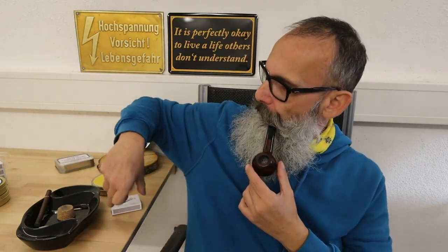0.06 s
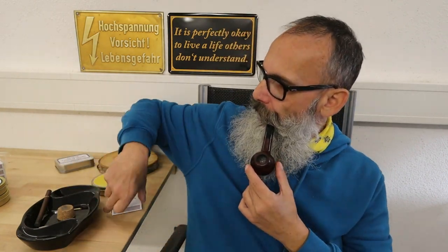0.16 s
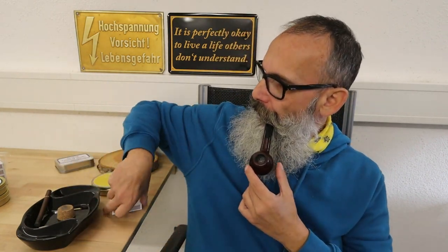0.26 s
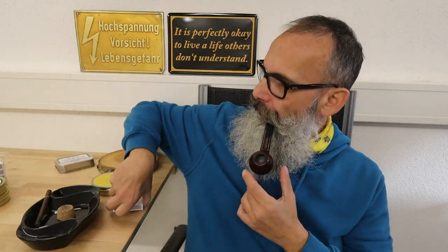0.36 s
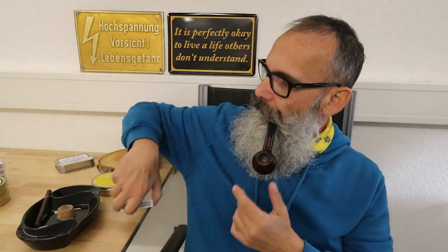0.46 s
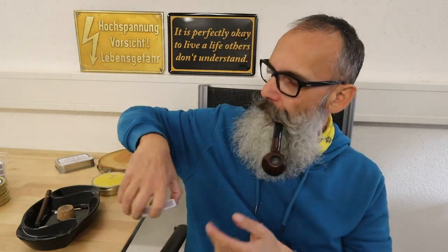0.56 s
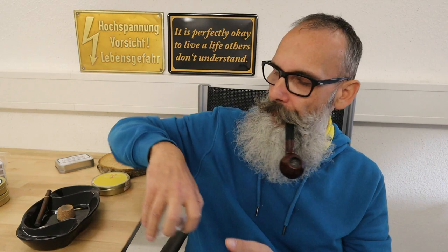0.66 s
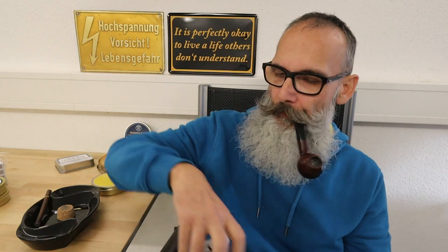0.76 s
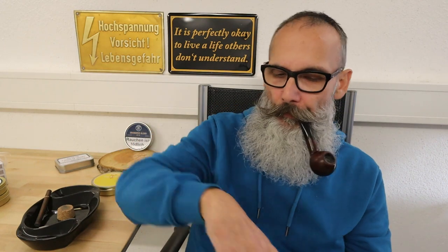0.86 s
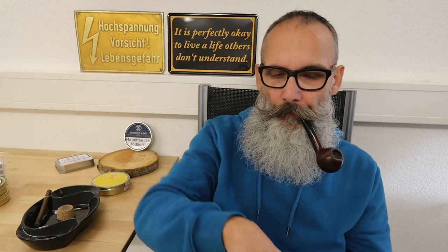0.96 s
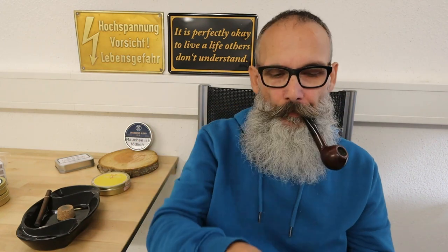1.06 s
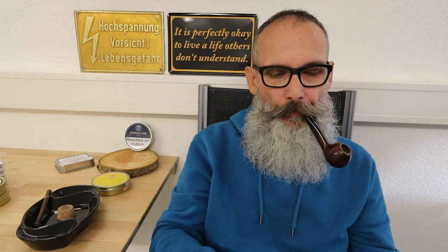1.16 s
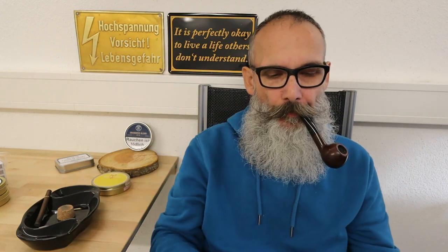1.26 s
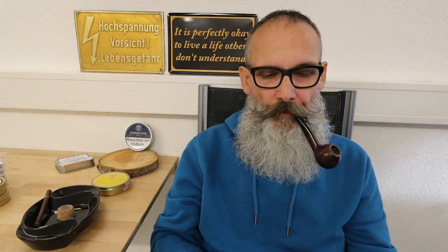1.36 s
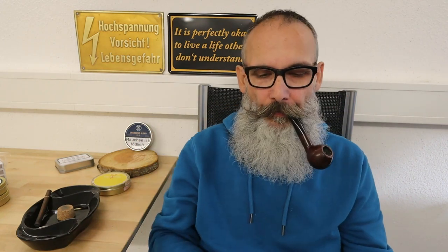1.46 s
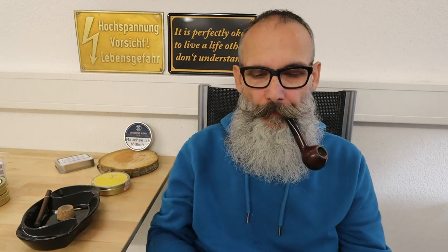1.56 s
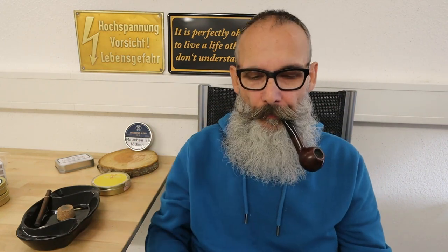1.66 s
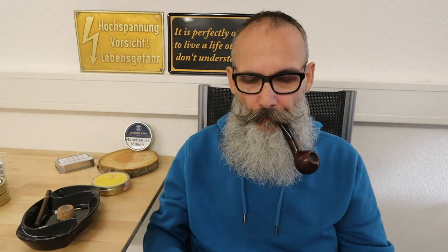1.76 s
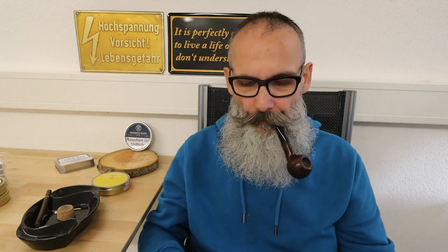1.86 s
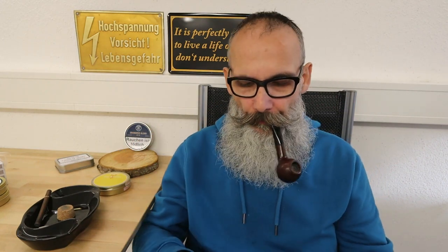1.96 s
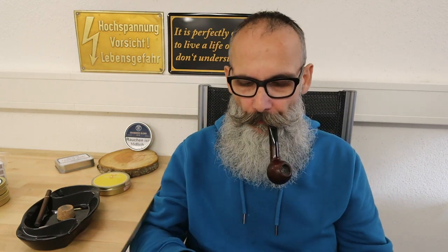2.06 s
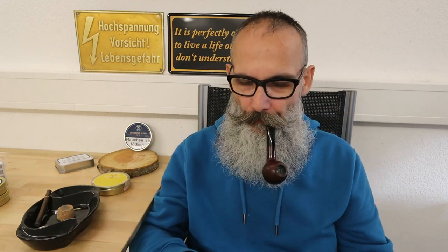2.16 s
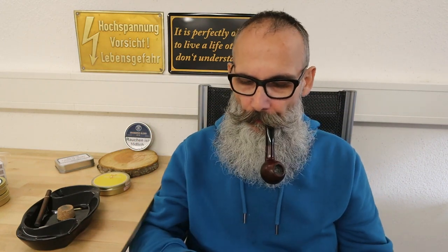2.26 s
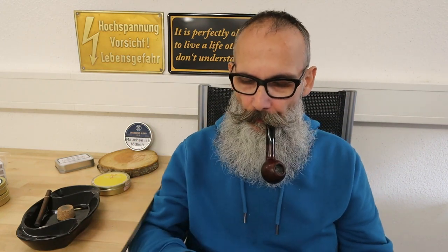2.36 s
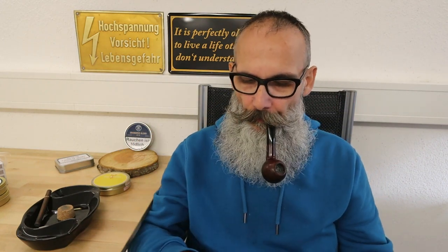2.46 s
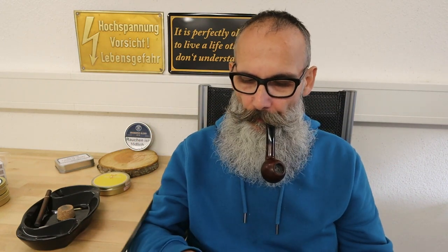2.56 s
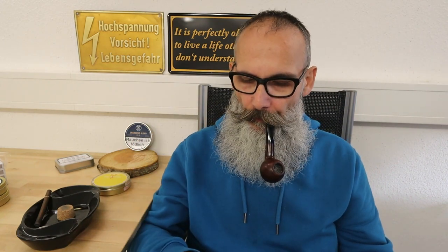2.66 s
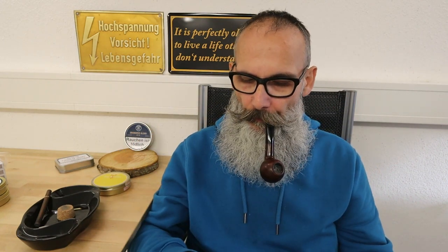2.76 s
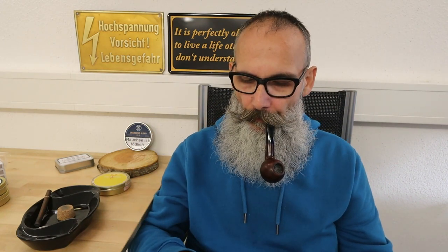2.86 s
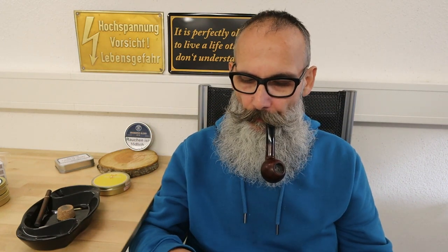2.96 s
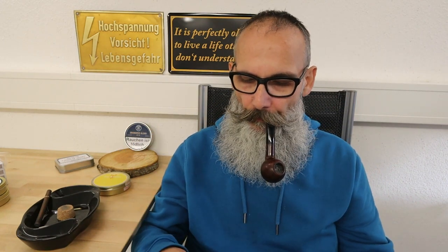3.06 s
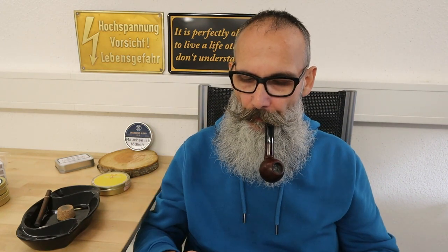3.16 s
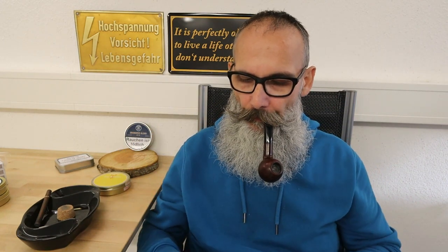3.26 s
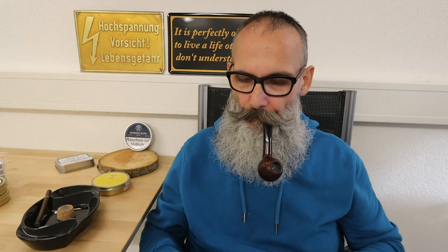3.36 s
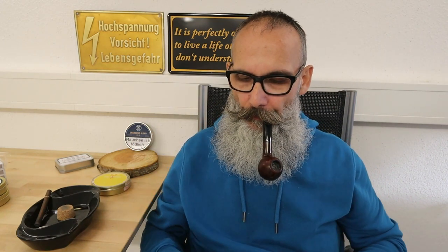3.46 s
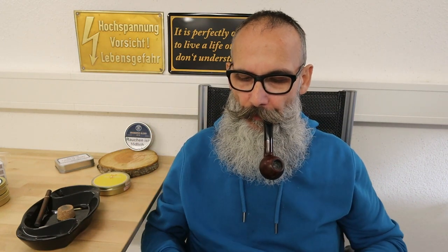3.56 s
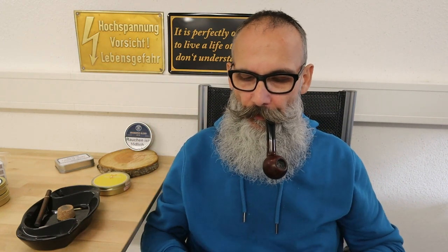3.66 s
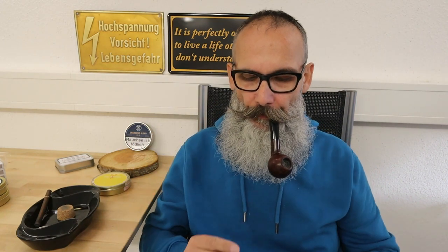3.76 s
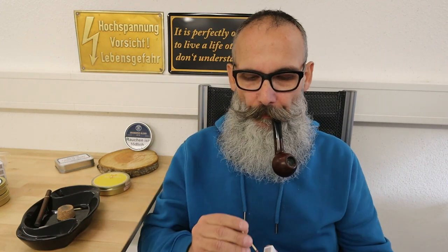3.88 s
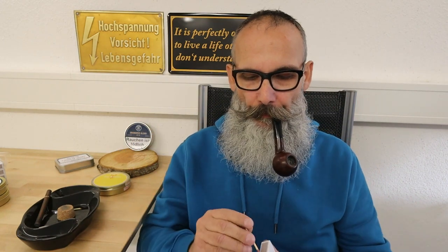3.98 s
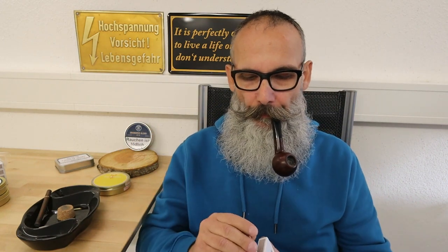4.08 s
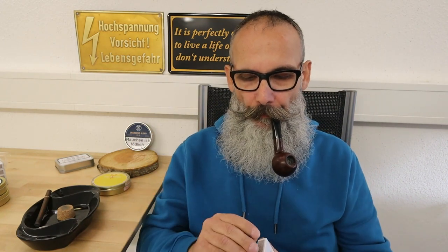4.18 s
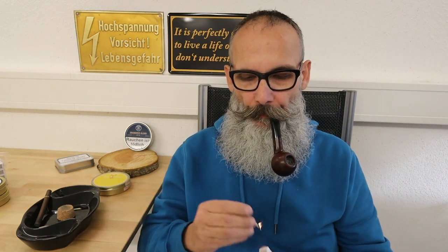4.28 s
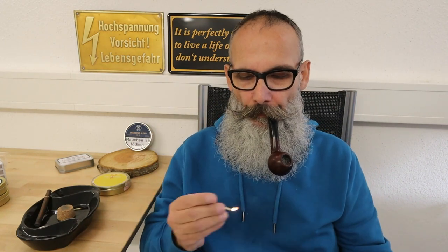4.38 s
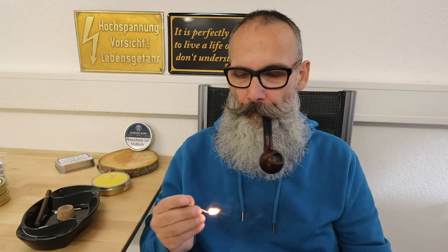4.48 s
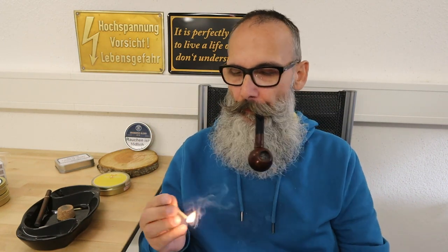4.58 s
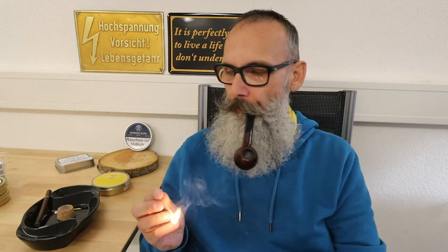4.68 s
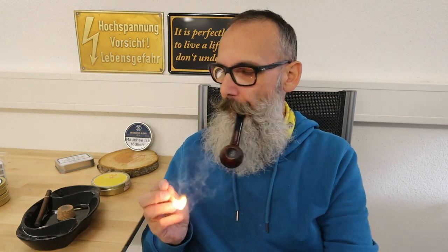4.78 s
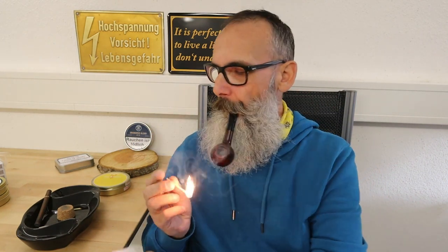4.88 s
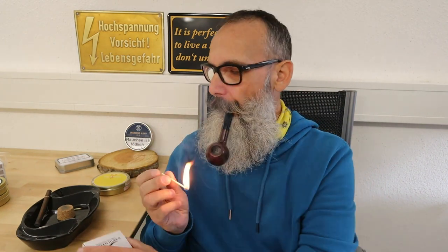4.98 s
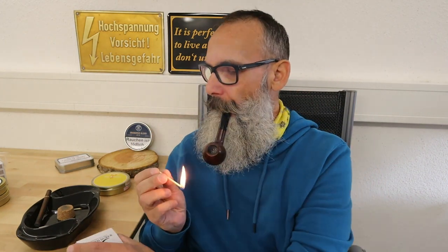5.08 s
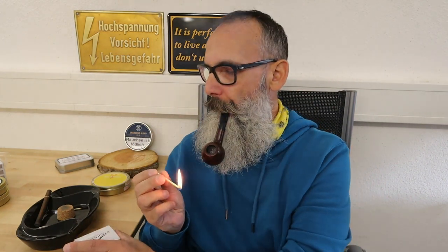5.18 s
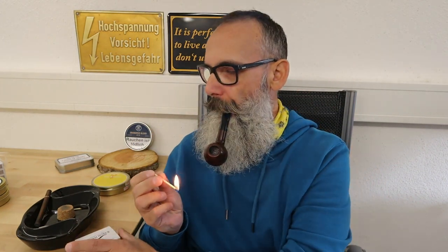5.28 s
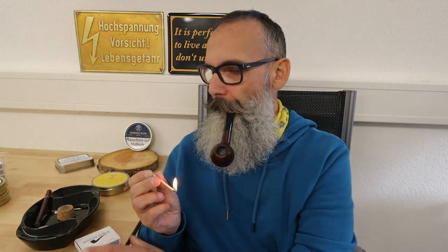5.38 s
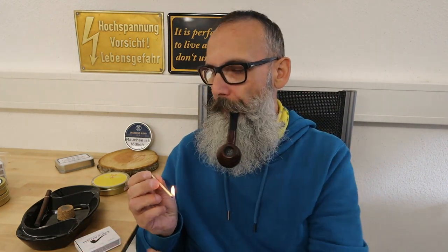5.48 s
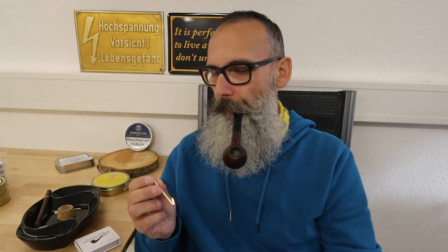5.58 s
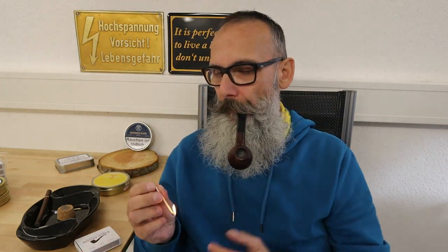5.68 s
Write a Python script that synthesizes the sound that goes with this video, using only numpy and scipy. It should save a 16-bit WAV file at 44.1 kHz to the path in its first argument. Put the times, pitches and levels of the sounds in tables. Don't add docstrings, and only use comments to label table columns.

```python
import sys
import numpy as np
from scipy import signal
from scipy.fft import rfft, irfft, next_fast_len
from scipy.io import wavfile

SR = 44100
rng = np.random.default_rng(int(sys.argv[2]) if len(sys.argv) > 2 else 0)


def voltage_ratio(level):
    return 10 ** (np.asarray(level, float) / 20)


def file_out(sig):
    cols = np.atleast_2d(sig).T
    lim = np.clip(cols, -1, 1)
    pcm = np.round(lim * 32767).astype(np.int16)
    wavfile.write(sys.argv[1], SR, pcm)


N = 252693

# centre in Hz, width in Hz, level in dB.
BOX_MODES = [(456, 440, 0), (3040, 970, 0), (4040, 580, 2.5), (4770, 810, 1), (6330, 2730, -5),
             (8670, 1800, -7), (14400, 1300, -19.5)]


def unit(x):
    return x / np.sqrt(np.mean(x ** 2) + 1e-20)


def along(points, hz):
    f, v = np.transpose(points)
    return np.interp(np.log(hz + 1), np.log(f + 1), v)


def curves(rows):
    s, level, *cols = np.transpose(rows)
    t = np.arange(N) / SR
    return [np.interp(t, s, level, -150, -150)] + [np.interp(t, s, c) for c in cols]


def wobble(rate):
    knots = rng.standard_normal(int(N * rate // SR + 2))
    return np.interp(np.arange(N) * rate / SR, np.arange(len(knots)), knots)


def swells(starts, lengths, gains, attack_s, fade_db_per_s):
    t = np.arange(N) / SR
    total = np.zeros(N)
    for s, hold, gain in zip(starts, lengths, gains):
        rise = np.clip(1 + (t - s) / attack_s, 0, 1) ** 2
        total += gain * rise * voltage_ratio(-fade_db_per_s * np.maximum(t - s - hold, 0))
    return total


def filtered(x, response, size=8192):
    m = next_fast_len(len(x) + size)
    return irfft(rfft(x, m) * response(np.fft.rfftfreq(m, 1 / SR)), m)[:len(x)]


def mode(f, hz, width):
    return 1j * f * width / (hz * hz - f * f + 1j * f * width)


def cavity(f, hz, width=300):
    return mode(f, hz, width) * mode(f, hz, 4 * width)


def walls(f):
    modes = 0
    for k, (hz, width, db) in enumerate(BOX_MODES[1:]):
        modes = modes + (-1) ** k * voltage_ratio(db) * mode(f, hz, width)
    return modes * 1j * f / (2200 + 1j * f)


def grit(count, spiky_db):
    size_db = spiky_db * np.minimum(rng.exponential(size=count), 4.5)
    return unit(rng.standard_normal(count) * voltage_ratio(size_db))


def opening(s):
    # time in seconds, cavity pitch in Hz.
    cavity_pitch = [(.2, 1800), (.38, 1370), (.56, 1380), (.75, 1930), (1.2, 1836), (1.4, 1720),
                    (1.5, 1770), (1.535, 2270), (1.57, 1740), (1.7, 1900), (2.14, 1960), (2.23, 1990),
                    (2.27, 1684), (2.6, 1685), (2.95, 1740), (3.2, 2000), (3.5, 2310), (3.58, 1390),
                    (3.8, 1300), (3.89, 1350), (4.1, 1280), (4.32, 1250), (4.37, 1640), (4.8, 1260),
                    (5.22, 1430), (5.245, 1900), (5.3, 1900), (5.36, 1260)]
    return np.interp(s, *np.transpose(cavity_pitch))


def air():
    # frequency in Hz, level in dB per Hz.
    vent_spectrum = [(12, -46), (20, -7), (107, -16), (154, -14.5), (193, -20.5), (277, -19), (301, -26),
                     (328, -20), (499, -22), (642, -24), (1030, -22.5), (7110, -34.5), (12800, -39),
                     (16000, -42)]
    # start in seconds, length in seconds, level in dB.
    traffic = [(.15, 0.25, -60), (0.796, 0.18, -52.5), (2.028, 0.058, -47), (2.686, 0.094, -57),
               (3.6, 0.44, -59.5), (5.04, 0.22, -52.5)]
    rush = filtered(rng.standard_normal(N), lambda f: voltage_ratio(along(vent_spectrum, f)) * f ** 2 / (f ** 2 + 60 ** 2))
    drone = unit(filtered(rng.standard_normal(N), lambda f: cavity(f, 66, 35)))
    s, hold, db = np.transpose(traffic)
    passing = swells(s, hold, voltage_ratio(db - 5), attack_s=0.52, fade_db_per_s=11.5)
    return voltage_ratio(-53 + 0.4 * wobble(2.5)) * unit(rush) + passing * drone


def table():
    # time in seconds, pitch in Hz, level in dB, 60 dB decay time in seconds.
    hums = [
        (0, 158, -32.5, 0.21),
        (0.062, 158.5, -44, 2.2),
        (5.234, 144.3, -42, 0.96),
        (5.38, 143.7, -46.5, 1.3),
    ]
    hum = np.zeros(N)
    for s, hz, db, t60 in hums:
        t = np.maximum(np.arange(N) / SR - s, 0)
        tone = np.sin(2 * np.pi * hz * t + 0.67 * wobble(28))
        hum += voltage_ratio(db - 4.5 - 60 * t / t60) * tone * np.clip(t / 0.0015, 0, 1)
    return hum * voltage_ratio(1.5 * wobble(11.0))


def squeak():
    # time in seconds, pitch in Hz, level in dB.
    drag = [(.248, 1940, -70), (0.259, 1913, -43), (.31, 1915, -53), (0.332, 1880, -81), (.35, 1847, -49),
            (0.384, 1930, -45), (.4, 1810, -77)]
    s, hz, db = np.transpose(drag)
    level_db, pitch = curves(np.transpose([s, db, hz]))
    turn = 2 * np.pi * np.cumsum(pitch + 60 * wobble(150)) / SR
    partials = np.sin(turn) + 0.75 * np.sin(1.88 * turn + 0.81 * wobble(370))
    return voltage_ratio(level_db - 1.0 + 2.6 * wobble(113.0)) * partials


def rubbing():
    # time in seconds, level in dB.
    tray_slide = [(1.452, -52), (1.458, -43.5), (1.49, -42), (1.52, -37.5), (1.54, -40), (1.548, -57)]
    # start in seconds, length in seconds, level in dB, brightness in dB.
    strokes = [(0.272, 0.19, -51, -6.5), (0.594, .26, -51.5, -6.5), (0.954, 0.33, -53.5, -5),
               (1.201, 0.051, -42.5, -11.5), (1.39, 0.25, -45.5, -3.5), (1.57, 0.38, -51, -18),
               (2.15, 0.084, -37.5, -2), (2.273, 0.095, -42.5, -1.5), (2.353, 0.014, -32.5, -18),
               (2.55, 0.19, -37, -6), (2.79, 0.24, -43, -5.5), (3.218, 0.046, -56.5, 1.5),
               (3.283, 0.11, -47, -1), (3.423, 0.11, -43, -5.5), (3.65, 0.13, -75, -5),
               (3.819, 0.053, -36.5, -8), (4.083, 0.28, -82, -31)]
    # start in seconds, length in seconds, level in dB.
    arm_moves = [(0.453, 0.26, -53.5), (1.59, 0.56, -49), (2.15, 0.76, -48), (3.787, 0.066, -49.5),
                 (4.527, 0.45, -49)]

    slips = unit(grit(count=N, spiky_db=2.2) * voltage_ratio(2.5 * wobble(90) + 2.2 * wobble(330)))
    s, hold, db, bright_db = np.transpose(strokes)
    attack_s, fade_db_per_s = 0.053, 101
    press = swells(s, hold, voltage_ratio(db - 4.0), attack_s, fade_db_per_s)
    bright = swells(s, hold, voltage_ratio(db + bright_db - 4.0), attack_s, fade_db_per_s)
    rub = slips * press
    slide = slips * voltage_ratio(curves(tray_slide)[0])

    hz = opening(np.arange(N) / SR)
    shut = np.clip((1700 - hz) / 400, 0, 1)
    wide = np.clip((hz - 1800) / 300, 0, 1)
    ajar = rub * np.sqrt(np.abs(1 - shut - wide)) + slide
    hollow = filtered(rub * np.sqrt(shut), lambda f: voltage_ratio(3.0) * cavity(f, 1300, 339) - voltage_ratio(-5) * cavity(f, 480, 377))
    hollow += filtered(rub * np.sqrt(wide), lambda f: cavity(f, 2330, 510) - voltage_ratio(-1) * cavity(f, 1190, 315))
    hollow += filtered(ajar, lambda f: voltage_ratio(2) * cavity(f, 1770, 300) - voltage_ratio(-7) * cavity(f, 980, 460))
    card = filtered(slips * bright + voltage_ratio(2.0) * slide, walls)

    s, hold, db = np.transpose(arm_moves)
    cloth = unit(filtered(slips, lambda f: cavity(f, 310, 364)))
    sleeve = swells(s, hold, voltage_ratio(db - 7.5), attack_s=0.3, fade_db_per_s=44) * cloth
    return voltage_ratio(17.5) * hollow - voltage_ratio(15.0) * card + sleeve


def pushes():
    # time in seconds, peak in dB.
    pops = [
        (1.4, -25.5),
        (3.6845, -17.5),
    ]
    low_hz, high_hz, edge_db = 216, 1900, -36
    blows = np.zeros(N)
    for s, db in pops:
        blows[round(s * SR)] = voltage_ratio(db + 23.5)

    def pulse(f):
        low_cut = (1j * f / (low_hz + 1j * f)) ** 2
        return low_cut * (1 / (1 + 1j * f / high_hz) ** 2 + voltage_ratio(edge_db))
    return filtered(blows, pulse)


def contacts():
    # time in seconds, peak in dB, brightness in dB, length in ms. Fingers rub the box
    lift = [(.2675, -32.5, 2, 1.6), (.2824, -33, -2, 0.79), (.368, -27, -5, 1.7), (.4952, -28.5, 4, 4.2),
            (.5529, -29, -2, 0.64), (.6673, -32.5, 6, 1.1), (.7295, -32, 2, 0.37), (.783, -23, 5.5, 3.7),
            (.8408, -31, 6, 1), (.95, -33, -4, 3.8), (1.0172, -32, -10, 0.82), (1.0397, -30.5, -9, 2.4)]
    tray_out = [(1.2214, -22, -1, 2), (1.2486, -16, -1, 1.3), (1.2613, -18, -1.5, 3),
                (1.2742, -15, -2, 0.61), (1.4057, -22, -17, 0.87), (1.4191, -19.5, -20, 1.2),
                (1.4372, -20, -11, 2.3), (1.4732, -14.5, -4, 3.7), (1.5061, -16, -16, 1.5),
                (1.5244, -17, -13, 0.58), (1.6688, -12.5, 4.5, 0.39), (1.672, -19, 8, 2.8),
                (1.7025, -17, -3, 2.8), (1.46, -17, -11, 3.3), (1.536, -9.5, -11, 1.2)]
    shake = [(2.1365, -12, 2, 1.1), (2.141, -8.5, 12, 2.5), (2.149, -10, 2, 1.8), (2.1534, -0.5, 2, 0.6),
             (2.158, -13, 3, 1.9), (2.1709, -17, 23, 1.9), (2.181, -24, 3, 3), (2.216, -15.5, 9, 3),
             (2.223, -15, 8, 3), (2.232, -11, 6, 0.87), (2.239, -25, 7, 3), (2.248, -17, 2, 3),
             (2.2553, -10.5, 1.5, 3), (2.264, -25, 2, 3), (2.3191, -4.5, 3, 1.5), (2.3341, -11.5, -9, 1.6),
             (2.352, -10.5, 8, 2.5), (2.3575, -3.5, 3, 2), (2.363, -11, 9, 0.61), (2.3705, -9, 19, 1.3),
             (2.378, -11, 6, 2.5), (2.39, -22, -13, 6.4), (2.556, -18, 8, 1.6), (2.5635, -13, 6, 1.4),
             (2.605, -33, 0, 2), (2.6219, -17, 12, 0.87), (2.638, -9.5, -3, 0.81), (2.6415, -13, -2, 0.94),
             (2.655, -21, -8, 3.3), (2.6671, -4.5, 2.5, 4.8), (2.7165, -6, -1.5, 0.76), (2.741, -21, 13, 3),
             (2.8025, -17, 5, 1.5), (2.807, -16, 9, 3.3), (2.815, -19.5, -1, 1.7), (2.8216, -6.5, -2.5, 3),
             (2.8317, -18, -17, 1.8), (2.8725, -11.5, 6, 1.5), (2.848, -19, 0, 3), (2.8873, -13.5, 9, 0.47),
             (2.9597, -19, 2, 1.2), (3.028, -25, 0, 1.4), (3.0481, -25.5, 0.5, 1.3),
             (3.126, -19.5, 4.5, 3.3)]
    pick = [(3.2783, -24.5, 2, 3), (3.327, -12, -4, .6), (3.3362, -12, -6, .6), (3.3438, -9, -0.5, .6),
            (3.3742, -16.5, 4, 4.5), (3.434, -20, 13, 4.3), (3.447, -20.5, 3, 3.9),
            (3.5215, -18.5, 12, 0.81), (3.5237, -18, 2, 1.8)]
    shut = [(3.8685, -10, 1, 1), (3.8785, -14.5, 3, 1.1), (3.882, -14, 1, 3), (3.8908, -12, -6, .7),
            (3.901, -19, 0, 3), (3.9179, -27, -31, 1.3), (3.9456, -20.5, -7, 3.8), (3.9727, -23, -14, 1),
            (4.1312, -30.5, -4, .84), (4.1898, -15, -8.5, 1.9), (4.194, -18.5, -3, 3.5),
            (4.2095, -23, 6, 0.79), (4.2125, -32, 0, 1.5), (4.2155, -25, 7, 0.44), (4.236, -21, -14, 0.86),
            (4.8546, -19, -9, 0.95)]
    lead_in = [
        (4.3575, -16, 2, 2),
        (4.361, -11, 1, 2),
        (4.364, -8, 0, 2),
    ]
    bumps = [(1.705, -22, -8, 1.2), (1.7076, -12, -0.5, 0.86), (2.0131, -33, -31, 1.3),
             (3.6002, -32, -10, 1.7), (3.8082, -11.5, 0, 0.65), (3.8125, -17.5, -23, 1.6),
             (3.822, -34, -24, 3.3), (3.8415, -27, -4, .5), (4.9741, -25, 2, .65), (5.2272, -22.5, 0, 1.6),
             (5.233, -26, -9, 2), (5.2428, -27, 4, 0.51), (5.2465, -20.5, -2, 2), (5.2565, -26, -14, 1.5),
             (5.284, -31, -18, 3.9), (5.313, -32, -6, 5), (5.3605, -33, -14, 3), (5.3965, -27.5, 11, 0.62)]
    taps = [
        (1.1235, -26, -6, 2.2),
        (1.193, -30, -20, 2),
    ]
    thud_level = {"lift": -10, "open": -22, "shake": -15, "pick": -23, "shut": -41, "bumps": -6.5, "taps":
                  -35}

    groups = {"lift": lift, "open": tray_out, "shake": shake, "pick": pick,
              "shut": [*shut, *lead_in], "bumps": bumps, "taps": taps}
    rows = []
    for name, group in groups.items():
        rise, lid_hz, lid_db = 1.65, 2400, -14.5
        if name in ("shut", "bumps"):
            rise, lid_hz, lid_db = 8.4, 2400, -13
        for s, db, bright_db, ms in group:
            hz = 1090 if name == "taps" else opening(s)
            detune = 1 + 0.025 * rng.standard_normal()
            thud_db = thud_level[name] + 3 * rng.standard_normal()
            rows.append((s, db, hz * detune, thud_db, bright_db, ms, rise, lid_hz * detune, lid_db))
    return rows


def knocks():
    size, lead = 2048, 900
    out = np.zeros(N + size)
    ms_axis = (np.arange(size) - lead) / SR * 1000
    f = np.fft.rfftfreq(size, 1 / SR)
    bright = walls(f)
    dull = cavity(f, *BOX_MODES[0][:2])
    for s, db, hz, thud_db, bright_db, ms, rise, lid_hz, lid_db in contacts():
        u = ms_axis / np.clip(2.24 * ms, 0.1, 6.5)
        swell = np.exp(-np.abs(u * np.where(u < 0, rise, 1) * 0.84) ** 1.1)
        click = 2.5 * (ms_axis == 0) / np.clip(ms, 0.5, 9)
        contact = rfft(grit(count=size, spiky_db=-1.0) * swell + click)

        soft = 1 / (1 + 1j * f / np.clip(9000 * voltage_ratio(2.4 * (db + 12)), 3200, 20000))
        width = np.clip(320 + 0.6 * (hz - 1800), 330, 600)
        inside = cavity(f, hz, width) - voltage_ratio(lid_db) * cavity(f, lid_hz, 436)
        hollow = unit(irfft(contact * inside))
        wall = unit(irfft(contact * bright * soft))
        thud = unit(irfft(contact * dull))
        knock = hollow - voltage_ratio(bright_db - 4.0) * wall - voltage_ratio(thud_db + 0.5) * thud
        start = round(s * SR) - lead
        out[start:start + size] += voltage_ratio(db - 6.0) * knock / np.abs(knock).max()
    return out[:N]


def strike():
    # time in seconds, level in dB.
    scrape = [(4.366, -50), (4.3672, -19), (4.372, -17), (4.378, -14), (4.384, -11.5), (4.3905, -11),
              (4.393, -17), (4.3965, -40)]
    # time in seconds, peak in dB.
    cracks = [(4.3671, 0), (4.3735, -2), (4.3772, -3), (4.3783, 0), (4.3799, -2), (4.3821, -3),
              (4.3844, -2), (4.3871, -3)]
    # time in seconds, level in dB, slips per second.
    chatter = [(4.369, -34, 480), (4.375, -19, 620), (4.381, -13, 830), (4.385, -7, 1090),
               (4.389, -5, 1270), (4.393, -10, 1340), (4.398, -30, 1370)]
    # frequency in Hz, level in dB per Hz.
    strip_spectrum = [(150, -18), (400, -11), (900, -8), (2000, -2), (3500, -3.5), (5000, -1.5),
                      (6500, -3.5), (8500, -4), (11000, -9.5), (14000, -7), (16000, -25)]

    pressure_db = -3
    grind = grit(count=N, spiky_db=4) * voltage_ratio(curves(scrape)[0] + pressure_db + 2.5 * wobble(500))
    chatter_db, rate = curves(chatter)
    slip = np.cos(2 * np.pi * np.cumsum(rate * (1 + 0.04 * wobble(400))) / SR)
    grind = grind * (1 + 0.7 * slip * (chatter_db > -15))
    boom = grind * 0.3
    for s, db in cracks:
        start = round(s * SR)
        grind[start:start + 4] += voltage_ratio(db) * np.array([-0.6, -0.8, -0.3, 0.5])
    rasp = filtered(grind, lambda f: voltage_ratio(along(strip_spectrum, f) + 8.5))
    hollow = voltage_ratio(13) * filtered(boom, lambda f: cavity(f, 1250, 340))
    return rasp + hollow + voltage_ratio(chatter_db - 4) * slip


def flame():
    # time in seconds, level in dB.
    flare = [(4.4, -48), (4.422, -23), (4.71, -38), (4.84, -35), (5.09, -37.5), (5.19, -57), (5.3, -41)]
    # frequency in Hz, level in dB per Hz.
    fizz_spectrum = [(350, -45), (600, -11.5), (931, -3), (1730, -4.5), (1980, -6), (6290, -10.5),
                     (14100, -22), (16000, -24)]
    # time in seconds, level in dB.
    spit_times = [
        (4.853, -33),
        (5.238, -34),
    ]
    sparks = grit(count=N, spiky_db=1.7)
    fizz = unit(filtered(sparks, lambda f: voltage_ratio(along(fizz_spectrum, f))))
    level = voltage_ratio(curves(flare)[0])
    t60 = 0.13
    t = np.arange(N) / SR
    for s, db in spit_times:
        level = level + voltage_ratio(db - 60 * np.abs(t - s) / t60) * np.clip((t - s) / 0.012, 0, 1)
    return level * voltage_ratio(-12 + 2.8 * wobble(25)) * fizz


def room(x):
    # frequency in Hz, 60 dB decay time in seconds.
    decay = [(150, 0.53), (500, 0.64), (1500, 0.61), (4000, 0.77), (8000, 0.76), (14000, 0.25)]
    out = np.zeros(N + SR)
    step, span = SR // 3, 2 * SR // 3
    for start in range(0, N, step):
        hz, t, z = signal.stft(rng.standard_normal(span), SR, nperseg=256)
        fade = voltage_ratio(-60 * t / along(decay, hz)[:, None])
        tail = signal.istft(z * fade, SR, nperseg=256)[1][:span]
        tail = tail * (1 + 0.9 * voltage_ratio(-60 * np.arange(span) / SR / 0.025))
        echo = signal.fftconvolve(x[start:start + step], tail / np.linalg.norm(tail))
        out[start + 70:][:len(echo)] += echo
    return out[:N]


def scene():
    hands = squeak() + rubbing() + pushes() + knocks() + strike() + flame()
    return (air() + table() + hands + voltage_ratio(-7) * room(hands))[None]


def top_cut(x):
    return signal.sosfilt(signal.butter(12, 16480, fs=SR, output="sos"), x)


def record(dry):
    low_cut_hz, top_hz = 38, 15830
    x = dry / (1 + np.abs(dry / 0.86) ** 5) ** (1 / 5)
    x = filtered(x[0], lambda f: (f < top_hz) * f ** 2 / (f ** 2 + low_cut_hz ** 2))[None]
    return top_cut(x)


dry = scene()
out = record(dry)
file_out(out)
```